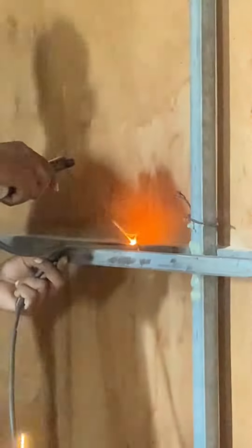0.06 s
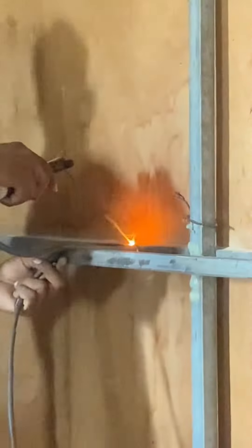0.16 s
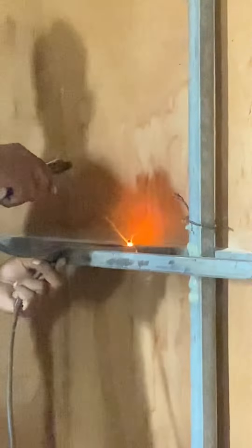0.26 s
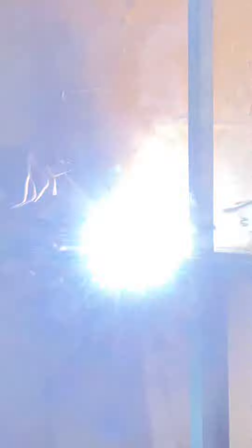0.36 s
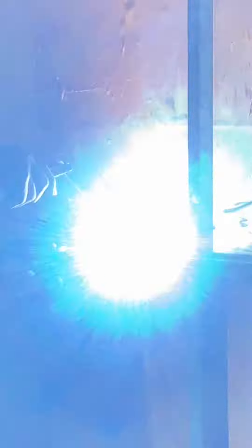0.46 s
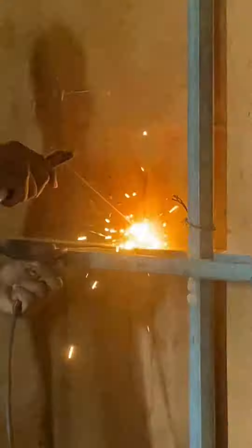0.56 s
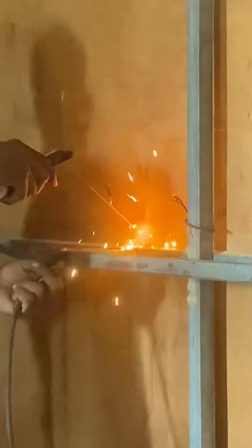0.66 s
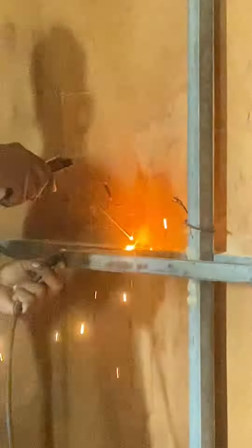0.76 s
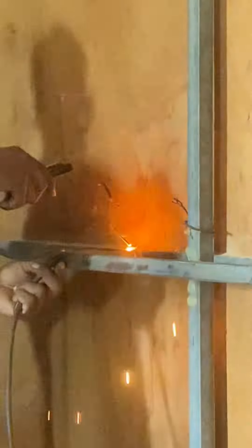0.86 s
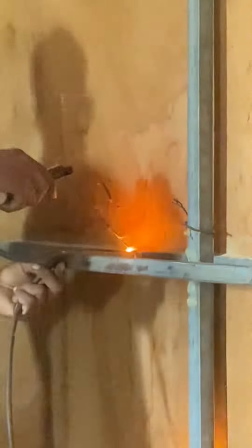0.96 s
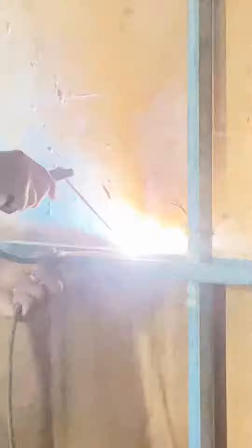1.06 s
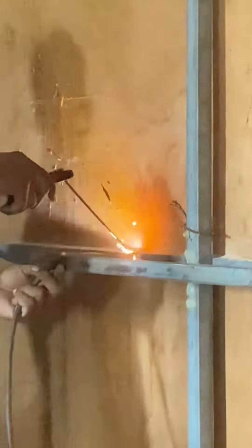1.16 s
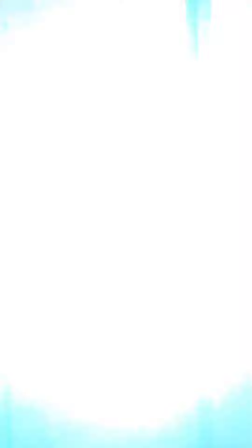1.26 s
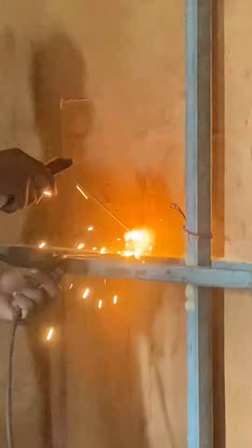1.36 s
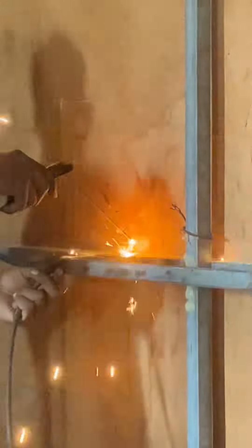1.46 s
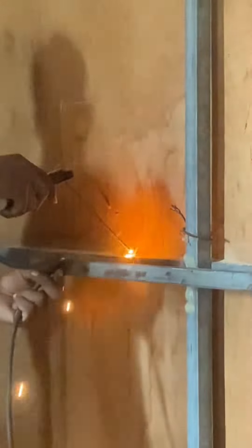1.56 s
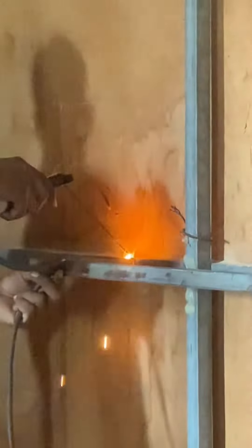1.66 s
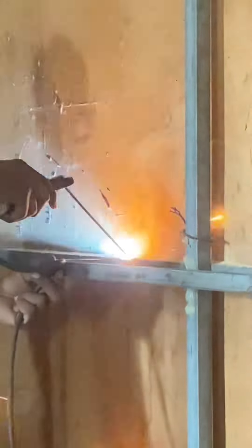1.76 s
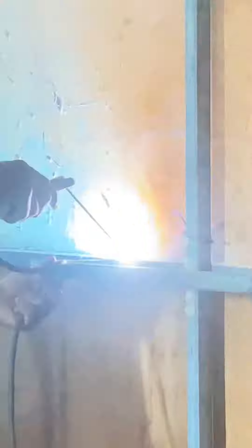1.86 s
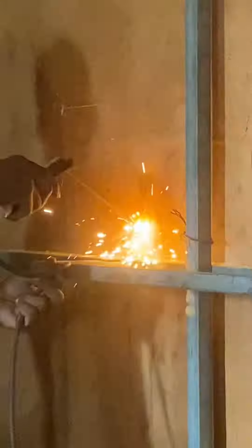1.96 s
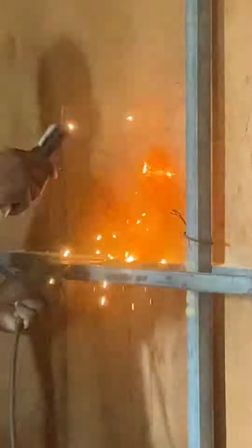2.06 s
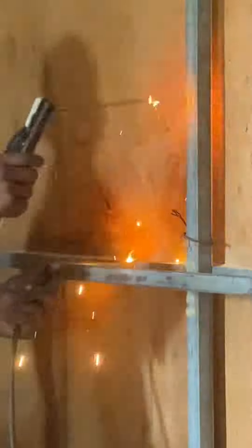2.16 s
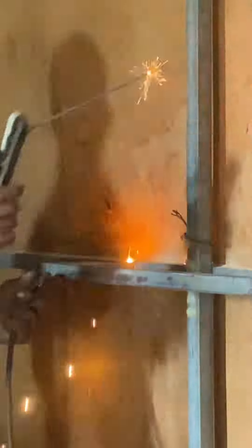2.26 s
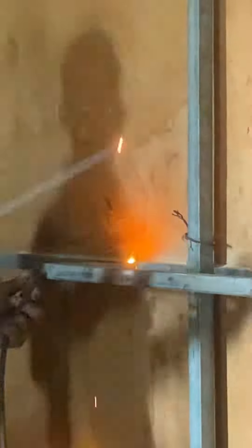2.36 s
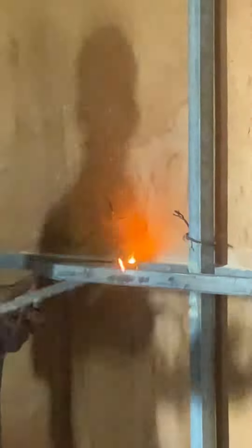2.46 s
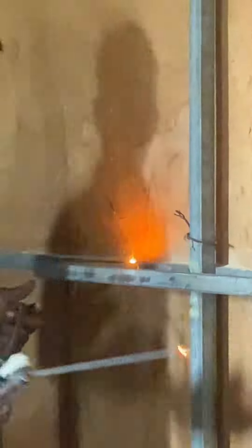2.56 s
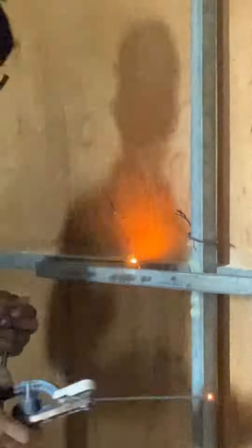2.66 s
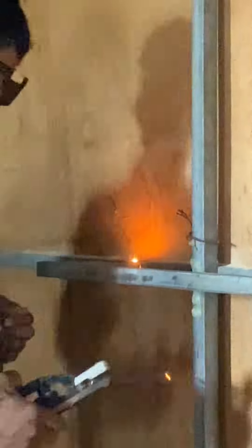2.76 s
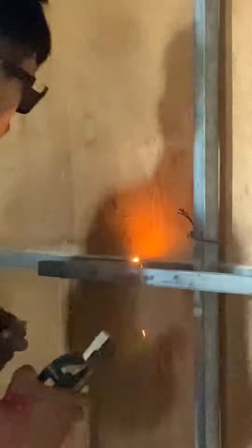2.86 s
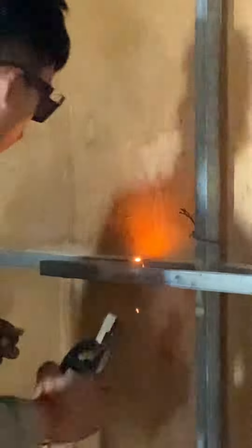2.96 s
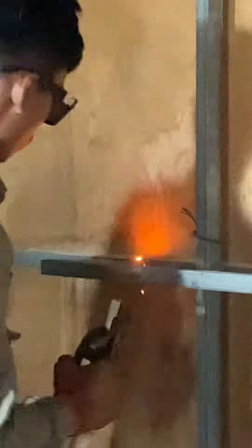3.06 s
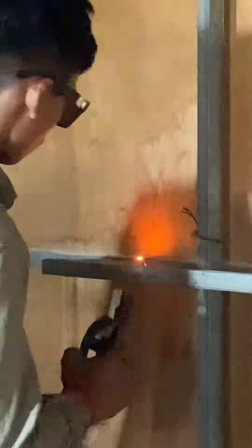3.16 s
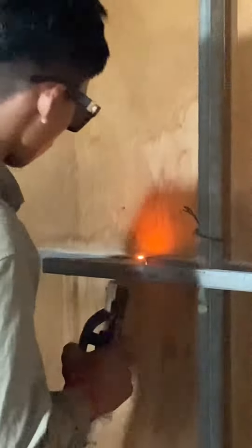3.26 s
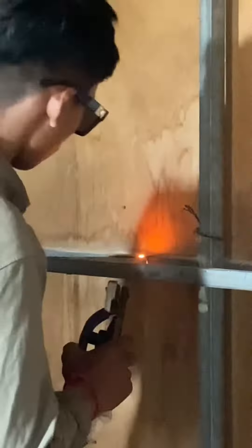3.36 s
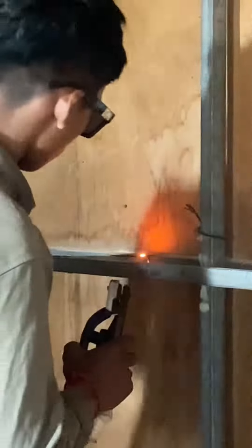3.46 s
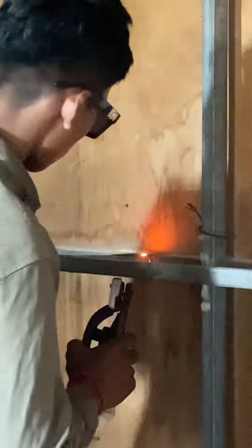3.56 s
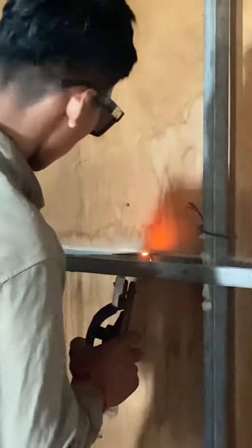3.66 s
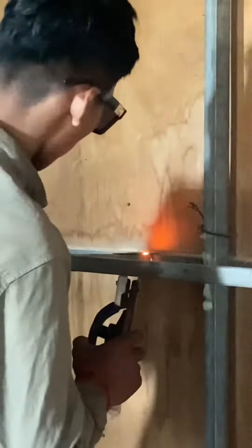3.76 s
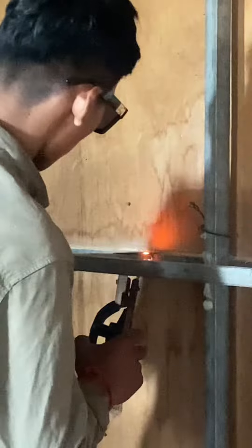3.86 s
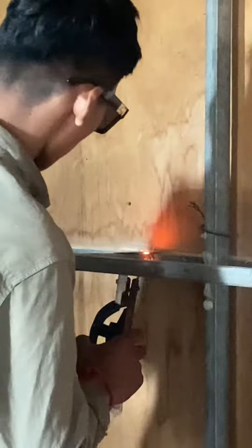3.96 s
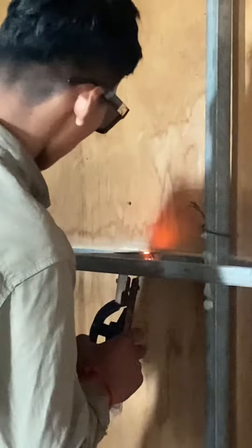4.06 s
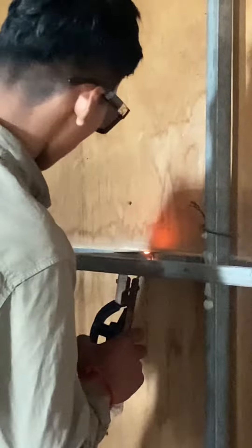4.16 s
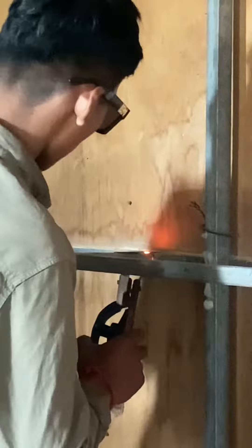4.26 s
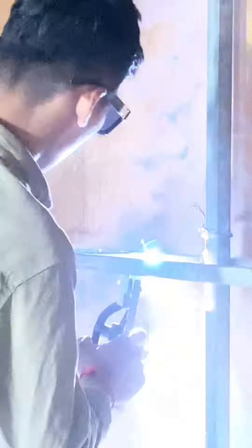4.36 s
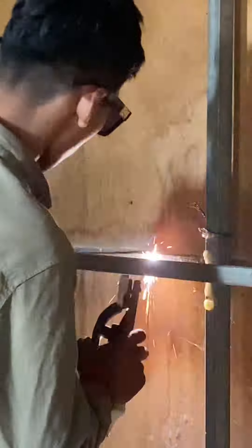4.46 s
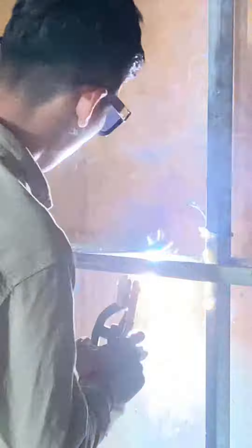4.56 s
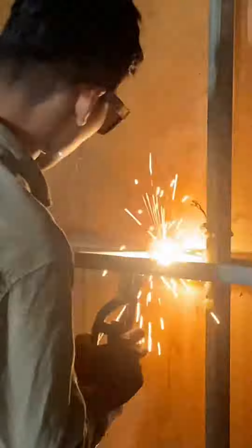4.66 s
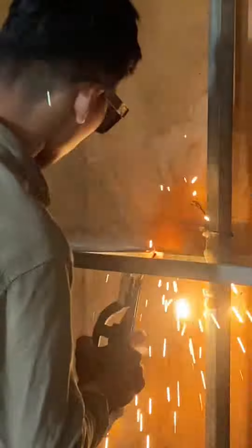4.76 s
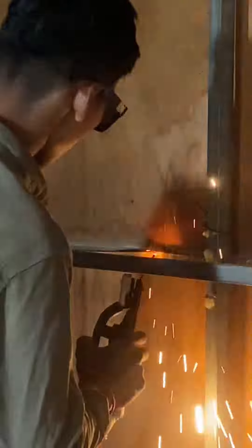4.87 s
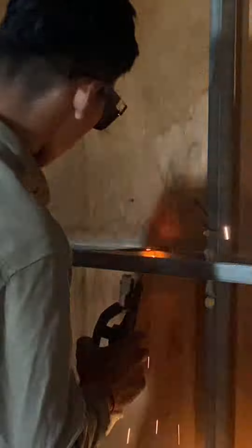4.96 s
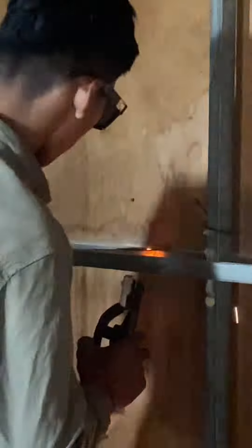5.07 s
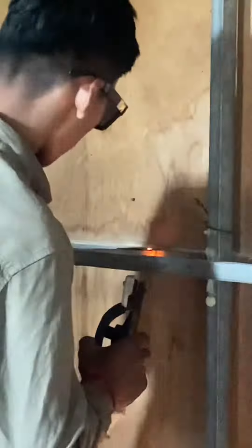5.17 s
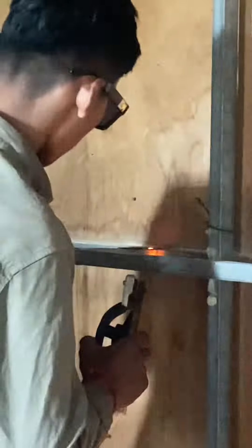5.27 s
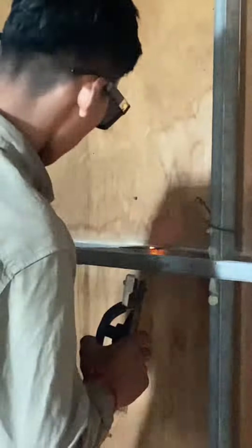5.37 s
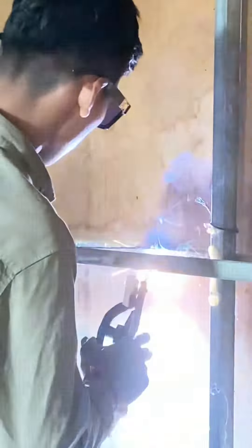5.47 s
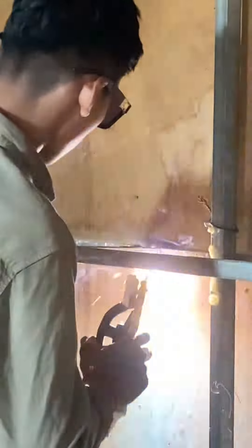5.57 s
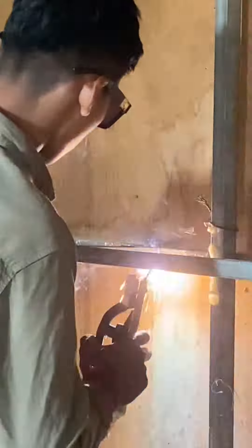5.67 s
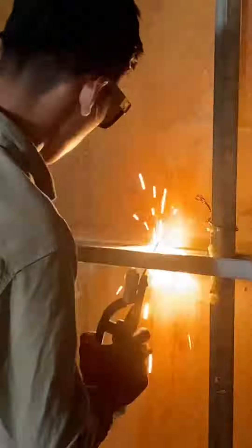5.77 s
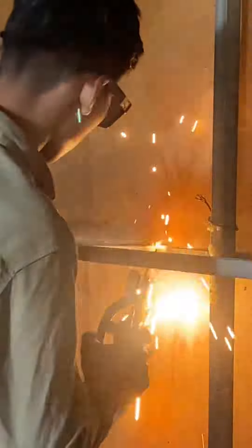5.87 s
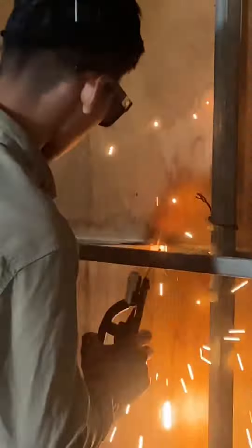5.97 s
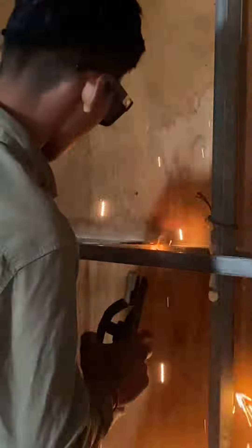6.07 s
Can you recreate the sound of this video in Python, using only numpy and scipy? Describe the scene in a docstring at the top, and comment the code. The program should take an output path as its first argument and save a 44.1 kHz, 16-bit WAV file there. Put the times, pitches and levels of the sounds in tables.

```python
"""Stick welding on a steel tube frame in a big bare-walled hall: six seconds, made from noise, clicks and modes.
First the arc spits close by (clicks on flickering hiss) while far steel bars clatter and ring (struck modes).
Mid-way come dull knocks (bursts of banded noise), a far scrape, wavering squeals (resonant noise) and thuds
(gliding sines); then more knocks, a short bar struck, and the arc's densest spits with the tube ringing under it.
All along run an engine drone and a motor whine (wavering sines) over the wash of the site (coloured noise)."""
import sys
import numpy as np
from scipy import signal
from scipy.fft import rfft, irfft
from scipy.io import wavfile

SR = 44100
rng = np.random.default_rng(int(sys.argv[2]) if len(sys.argv) > 2 else 0)


def persist_wave(psi):
    """Save psi, clipped to +-1, as 16-bit WAV."""
    counts = np.round(np.clip(psi, -1, 1) * 32767).astype(np.int16)
    wavfile.write(sys.argv[1], SR, np.atleast_2d(counts).T)


N = 269892
T = np.arange(N) / SR


def amp(db):
    """dB to gain."""
    return 10 ** (np.asarray(db) / 20)


def rms_one(x):
    """Scale to unit rms."""
    return x / np.sqrt(np.mean(x ** 2) + 1e-20)


def lowpass(x, order, cut_hz):
    """Butterworth treble cut."""
    return signal.lfilter(*signal.butter(order, cut_hz, fs=SR), x)


def highpass(x, cut_hz):
    """Second-order Butterworth bass cut."""
    return signal.sosfilt(signal.butter(2, cut_hz, "high", fs=SR, output="sos"), x)


def bandpass(x, order, low_hz, high_hz):
    """Butterworth band."""
    return signal.sosfilt(signal.butter(order, [low_hz, high_hz], "band", fs=SR, output="sos"), x)


def column(rows, index=1):
    """One column of a time curve, read at every sample."""
    rows = np.array(rows)
    return np.interp(T, rows[:, 0], rows[:, index])


def at_hz(points, hz):
    """A curve over frequency, read on a log-frequency axis."""
    points = np.array(points)
    return np.interp(np.log(hz + 1), np.log(points[:, 0]), points[:, 1])


def coloured(x, spectrum):
    """Give a signal a spectrum; rms 1."""
    hz = np.arange(N // 2 + 1) * SR / N
    return rms_one(irfft(rfft(x) * amp(at_hz(spectrum, hz)), N))


def drift(rate_hz):
    """Slow random wander of rms 1: noise twice through a one-pole low-pass, at a fortieth of the sample rate."""
    r = np.exp(-80 * np.pi * rate_hz / SR)
    noise = rng.standard_normal(N // 40 + 2002)
    slow = signal.lfilter([1], [1, -2 * r, r * r], noise)[2000:]   # without its run-in
    return np.interp(np.arange(N) / 40, np.arange(len(slow)), rms_one(slow))


def ring(x, hz, t60):
    """One mode: a unit click sets a sine of height 1 ringing, down 60 dB after t60 seconds."""
    r = amp(-60 / (t60 * SR))
    w = 2 * np.pi * hz / SR
    return signal.lfilter([0, np.sin(w)], [1, -2 * r * np.cos(w), r * r], x + 1e-18)


def peaks(x, table):
    """Noise twice through each of a few resonances."""
    out = 0
    for hz, width, db in table:
        t60 = 1.4 / width
        out = out + amp(db) * rms_one(ring(ring(x, hz, t60), hz, t60))
    return out


def grains(per_s, spread_db):
    """Random clicks of very uneven size; rms 1."""
    sizes = amp(spread_db * np.minimum(rng.exponential(1, N), 5)) * rng.choice([-1, 1], N)
    return rms_one(sizes * (rng.random(N) < per_s / SR))


def swell(start, rise, hold, db, fade_db_per_s):
    """Rise, hold, then a steady fade in dB."""
    t = T - start
    fade_db = fade_db_per_s * np.maximum(t - rise - hold, 0)
    return np.clip(t / rise, 0, 1) * amp(db - fade_db)


# Flares of the arc, and the bright hiss of the steel crashes at 0.22, 1.15 and 1.47 s. Each row: start in seconds,
# hold in seconds, sizzle level in dB, fade in dB per second.
SIZZLE_SWELLS = [(0.224, .01, -33, 300), (0.26, 0.054, -37, 85), (0.367, 0.005, -35, 400),
                 (0.397, 0.027, -33, 96), (0.929, 0.0037, -54, 395), (1.043, 0.0024, -39.5, 198),
                 (1.118, .03, -40.5, 90), (1.154, 0.018, -34, 145), (1.47, 0.0092, -31, 402),
                 (1.713, 0.077, -36.5, 200), (1.848, 0.028, -33.5, 211), (4.106, 0.0074, -43, 65),
                 (4.31, 0.0038, -19, 296), (4.34, 0.12, -31, 147), (4.441, 0.0085, -32, 102),
                 (4.529, 0.018, -26, 352), (4.957, 0.0045, -52, 90), (5.398, 0.18, -31, 150),
                 (5.634, 0.022, -25.5, 213), (5.667, 0.004, -33, 258), (5.852, 0.027, -46, 194)]
# The loudest spits. Each row: time in seconds, click level in dB before trim and bass cut.
ARC_SPITS = [(0.377, -19), (0.4034, -31), (0.4125, 0), (0.4444, -30), (1.0535, -30), (1.713, -37),
             (1.7393, -29), (1.8794, -17), (3.8397, -19), (4.318, -9), (4.421, -22), (4.436, -20),
             (4.4455, -15), (4.52, -13), (4.554, -8), (5.405, -2), (5.409, -2), (5.498, -4), (5.545, -18),
             (5.5657, -22), (5.628, -6), (5.633, -8), (5.647, -9), (5.663, -14), (5.6802, 5), (5.7, -10),
             (5.706, -13), (5.714, -17)]
# Colour of the sizzle. Each row: frequency in Hz, density in dB per Hz (relative).
SIZZLE_SPECTRUM = [(600, 5), (1500, 6.5), (3000, 3), (5000, 10), (7500, 14), (10500, 1.5), (13000, 10),
                   (15500, -20), (17000, -30)]
SIZZLE_RISE_S = 0.0059
POPS_PER_S, POP_DB, POP_TOP_HZ = 220, -4, 5900   # spatter; level against the sizzle swells
POP_FIZZ_DB = -7   # pops fizz less than spits
SPIT_TRIM_DB, SPIT_LOW_HZ = -4, 1500   # the bass cut serves spits, pops and fizz


def arc():
    """Tiny discharges on flickering hiss (also the crashes' treble), spatter pops, and lone spits that fizz."""
    swells = [swell(start, SIZZLE_RISE_S, *rest) for start, *rest in SIZZLE_SWELLS]
    level = np.sqrt(sum(one ** 2 for one in swells))
    plasma = 0.78 * grains(1700, spread_db=4.0) + 2.2 * rng.standard_normal(N)
    sizzle = level * amp(0.68 * drift(54)) * coloured(plasma, SIZZLE_SPECTRUM)
    pops = lowpass(amp(POP_DB) * level * grains(POPS_PER_S, spread_db=2.0), 2, POP_TOP_HZ)
    spits = np.zeros(N)
    for s, db in ARC_SPITS:
        spits[int(s * SR)] = amp(db + SPIT_TRIM_DB)
    fizz_source = spits + amp(POP_FIZZ_DB) * np.abs(pops)
    fizz_level = signal.lfilter([.4], [1, -np.exp(-1 / (0.001 * SR))], fizz_source)   # dies with a 1 ms constant
    fizz = fizz_level * rng.standard_normal(N)
    return sizzle + highpass(spits + pops + fizz, SPIT_LOW_HZ)


BLOW_SPREAD_DB = 2.5   # how unevenly one fall strikes the modes


def steel(blows, modes, body, crack_db, ring_db):
    """Each fall is a clatter of contacts: a broad crack, and tight mode clusters struck unevenly each time."""
    contacts = grains(3000, spread_db=3.0)
    bursts = []
    for s, db, length, cut_hz in blows:
        part = slice(int(s * SR), int((s + 6 * length) * SR))
        t = T[part] - s
        envelope = np.exp(-t / length) * (1 - np.exp(-t / 0.0029))
        burst = amp(db) * contacts[part] * envelope
        bursts.append((part, lowpass(burst, 2, min(cut_hz, .4 * SR))))

    def clatter(strengths_db):
        """All falls in line, each with its own strength."""
        out = np.zeros(N)
        for (part, burst), db in zip(bursts, strengths_db):
            out[part] += amp(db) * burst
        return out

    even = clatter(np.zeros(len(blows)))
    out = amp(crack_db) * np.std(even) * coloured(even, body)
    split_modes = [(hz * split, db, t60) for hz, db, t60 in modes for split in (.995, 1.0, 1.005)]
    uneven_db = BLOW_SPREAD_DB * rng.standard_normal((len(blows), len(split_modes)))
    heard = slice(bursts[0][0].start, bursts[-1][0].stop + SR)   # ring on for a second after the last fall
    for k, (hz, db, t60) in enumerate(split_modes):
        out[heard] += amp(db + ring_db) * ring(clatter(uneven_db[:, k])[heard], hz, t60)
    return out


# Long bars dropped far off. Each row: start in seconds, relative level in dB, clatter decay constant in seconds,
# contact cut-off in Hz.
BAR_DROPS = [(.227, -21.5, 0.044, 4870), (.275, -24.5, 0.047, 2950), (.33, -34, 0.083, 3940),
             (.4, -29.5, 0.043, 5000), (.48, -28, 0.065, 4400), (.59, -38.5, 0.098, 2900),
             (1.15, -15.5, 0.019, 7500), (1.168, -14.5, 0.011, 4570), (1.2, -17, 0.0094, 3140),
             (1.25, -25.5, 0.041, 4440), (1.33, -32, 0.34, 3540), (1.478, -23.5, 0.052, 6470),
             (1.52, -27, 0.048, 2790)]
# Modes of the long bars. Each row: frequency in Hz, relative level in dB, 60 dB decay in seconds.
LONG_BAR_MODES = [(270, -13, .4), (330, -10, .5), (415, -15, .4), (452, -8, .5), (560, -13, .3),
                  (640, -12, .3), (731, -3, .35), (768, -1, .35), (823, -3, .5), (890, -4, .45),
                  (930, -4, .4), (964, -4, .5), (1008, -3, .55), (1041, 0, .6), (1085, -6, .35),
                  (1130, -7, .4), (1276, -11, .4), (1348, -8, .6), (1416, -9, .4), (1560, -5, .45),
                  (1810, -12, .6), (1940, -12, .4), (2308, -14, .6), (2435, -14, .4), (2713, -13, .5),
                  (2920, -13, .3), (3165, -10, .3), (3270, -11, .3), (3415, -10, .3), (3610, -10, .4),
                  (3890, -14, .3)]
# Crack of a long bar. Each row: frequency in Hz, colouring in dB (relative).
LONG_BAR_CRACK = [(120, -67), (250, -11.5), (500, -1), (750, -11.5), (1100, 2.5), (1500, 4), (2300, -6.5),
                  (3500, -1.5), (4500, -4.5), (9000, -10), (16000, -12)]


def dropped_bars():
    """Long steel bars clatter and ring; a bass cut keeps mainly the sound above 220 Hz."""
    return highpass(steel(BAR_DROPS, LONG_BAR_MODES, LONG_BAR_CRACK, crack_db=14.0, ring_db=-34.0), 220)


# A shorter bar struck. Each row: start in seconds, relative level in dB, clatter decay constant in seconds,
# contact cut-off in Hz.
SHORT_BAR_BLOWS = [(4.587, -16.5, 0.013, 6000), (4.61, -31, 0.058, 5383), (4.68, -53, 0.017, 4000)]
# Modes of the short bar. Each row: frequency in Hz, relative level in dB, 60 dB decay in seconds.
SHORT_BAR_MODES = [(1168, 0, .3), (1491, -8, .25), (1733, -9, .18), (1916, -6, .18), (2213, -9, .2),
                   (2700, -9, .2), (2939, -6, .2), (3241, -9, .2), (3490, -11, .9), (3639, -9, .4),
                   (3876, -7, .22), (4027, -6, .22), (4194, -10, .3), (4457, -8, .35), (4678, -10, .22),
                   (4931, -8, .3), (5437, -10, .3), (5760, -13, .15)]
# Crack of the short bar. Each row: frequency in Hz, colouring in dB (relative).
SHORT_BAR_CRACK = [(300, 7), (900, -18), (1300, 7.5), (2500, -12), (3500, 0), (5500, -2), (7500, -11),
                   (12000, -43)]


def struck_bar():
    """A shorter bar clangs: the same crack and ringing, with higher modes."""
    return steel(SHORT_BAR_BLOWS, SHORT_BAR_MODES, SHORT_BAR_CRACK, crack_db=17.5, ring_db=-30.5)


# Dull knocks and scuffs. Each row: start in seconds, nominal peak in dB, lowest Hz, highest Hz,
# decay constant in seconds, hall send in dB.
KNOCK_BLOWS = [(0.975, -11.5, 138, 637, 0.0028, -11), (2.018, -21.5, 414, 617, 0.12, -3.5),
               (2.072, -18, 375, 750, 0.0098, -3), (2.185, -28.5, 367, 580, 0.0065, 14),
               (2.607, -31.5, 410, 751, 0.022, 17), (2.643, -32, 524, 660, 0.0051, 13.5),
               (3.02, -12, 201, 880, 0.0059, -14), (3.413, -28, 202.3, 600, 0.0054, -20),
               (3.593, -20, 200.2, 600, 0.01, -17), (4.251, -12, 297.6, 2600, 0.0061, -2),
               (4.259, -13, 300, 2786, 0.0096, -28), (4.262, -20.5, 273, 1220, 0.0075, 13.5),
               (4.27, -21, 220, 900, 0.0054, -16), (4.279, -27, 300, 3200, 0.0044, -16),
               (4.322, -14, 278, 2430, 0.0012, 0), (4.351, -14.5, 400, 2780, 0.007, -21),
               (4.364, -18.5, 397, 2430, 0.0043, -19), (4.466, -15.5, 390, 1900, 0.0062, -5),
               (4.559, -21.5, 2670, 3405, 0.0042, 4), (5.638, -26, 1100, 3007, 0.0044, -17),
               (5.703, -15.5, 186, 657, 0.011, -9), (5.824, -54, 253, 685, 0.0082, -18)]
KNOCK_CREST_DB = 11.5   # nominal peak over rms
KNOCK_EDGE = 5.1   # the first contact, against the rough tail


def knocks():
    """Short rough bursts in a band, heaviest at its low end; returns the near sound and the hall send."""
    near, far = np.zeros(N), np.zeros(N)
    rough = rng.standard_normal(N)
    for s, db, low_hz, high_hz, length, hall_db in KNOCK_BLOWS:
        part = slice(int(s * SR), int((s + 7 * length) * SR))
        t = T[part] - T[part][0]
        burst = rough[part] * np.exp(-t / length) * (1 - np.exp(-t / 0.0015))
        burst[0] += KNOCK_EDGE
        heavy = lowpass(burst, 1, 1.2 * low_hz)
        blow = amp(db - KNOCK_CREST_DB) * rms_one(bandpass(heavy, 3, low_hz, high_hz))
        near[part] += blow
        far[part] += blow * amp(hall_db)
    return near, far


# Low thuds. Each row: start in seconds, level in dB, settled pitch in Hz, start pitch over end pitch,
# 60 dB decay in seconds.
THUDS = [(0.431, -11.5, 57, 2.45, 0.12), (2.951, -9, 55.3, 1.7, 0.085), (3.835, -19, 39.76, 0.89, 0.17),
         (4.59, -18.5, 116.3, 1.34, 0.99), (4.597, -24, 173, 1.17, 0.73)]


def thuds():
    """Lone decaying sines with a soft start; the pitch glides, mostly downwards, as the contact lets go."""
    out = np.zeros(N)
    glide_s = .025
    for s, db, hz, start, t60 in THUDS:
        t = np.maximum(T - s, 0)
        cycles = hz * (t + (start - 1) * glide_s * (1 - np.exp(-t / glide_s)))
        envelope = 1000 ** (-t / t60) * (1 - np.exp(-t / .004))
        out += amp(db) * np.sin(2 * np.pi * cycles) * envelope
    return out


# Faint hums, squeals, and from 5.4 s the tube ringing under the arc. Each row: start in seconds, end in seconds,
# relative level in dB, frequency in Hz, width in Hz, hall send in dB.
WAVERING_TONES = [(1.25, 1.7, -42, 152, 9.1, -4), (2.35, 2.63, -39, 135, 8.9, -4),
                  (3.22, 3.75, -41, 126, 9, -4), (2.04, 2.36, -47, 3400, 80, -6),
                  (2.56, 2.8, -44, 2244, 40, -10), (2.62, 2.82, -47, 3530, 160, -8),
                  (2.88, 3.24, -46, 2980, 35, -8), (2.95, 3.1, -49, 2650, 50, -8),
                  (2.92, 3.2, -39, 760, 30, -4), (2.9, 3.18, -54, 4860, 90, -10),
                  (2.93, 3.35, -39, 1110, 70, -6), (5.41, 5.53, -42, 4500, 150, -20),
                  (5.55, 5.62, -44, 3550, 120, -20), (5.59, 5.7, -31, 1500, 300, -20),
                  (5.47, 5.56, -44, 2550, 200, -20), (5.57, 5.67, -39, 2550, 200, -20),
                  (5.62, 5.71, -41, 4720, 130, -20), (5.41, 5.46, -39, 1550, 200, -20)]


def wavering():
    """Narrow resonances fed with noise swell fast, flicker and fade; returns near sound and hall send."""
    near, far = np.zeros(N), np.zeros(N)
    white = rng.standard_normal(N + SR)
    flicker = amp(1.5 * drift(15))
    for start, end, db, hz, width, hall_db in WAVERING_TONES:
        first, last = int(start * SR), min(int(end * SR), N)
        tone = peaks(white[first:last + SR // 4], [(hz, width, db)])[SR // 4:]   # after a quarter second run-in
        envelope = np.abs(np.sin(np.pi * np.linspace(0, 1, last - first) ** 0.6)) ** 0.7
        tone = tone * flicker[first:last] * envelope
        near[first:last] += tone
        far[first:last] += tone * amp(hall_db)
    return near, far


# Far scraping hiss, one row: start in seconds, swell in seconds, hold in seconds, relative level in dB,
# fade in dB per second.
SCRAPE_SWELL = (2, 0.19, 0.17, -45, 85)
# Its resonances. Each row: frequency in Hz, width in Hz, relative level in dB.
SCRAPE_RESONANCES = [(5250, 300, -4), (5200, 1100, -2), (5670, 150, -12), (6100, 900, -6), (7400, 700, -7),
                     (8540, 70, -22), (8800, 500, -14), (10900, 1300, -20)]


def scrape():
    """Noise through high resonances, swelling once and flickering slightly."""
    hiss = peaks(rng.standard_normal(N), SCRAPE_RESONANCES)
    return swell(*SCRAPE_SWELL) * amp(.8 * drift(20)) * hiss


# Engine drone. Each row: time in seconds, pitch in Hz, rms level in dB.
ENGINE_DRONE = [(0, 54.55, -30.5), (1.0, 53.84, -30), (1.09, 55.4, -63), (1.22, 53.5, -30),
                (1.76, 54.3, -23), (1.89, 54.2, -51), (2.11, 54.7, -29.5), (2.95, 54.23, -29.5),
                (3.18, 54.56, -33), (3.42, 53.4, -27), (3.62, 52.8, -28), (3.86, 56.1, -18),
                (4.08, 57.8, -27.5), (4.25, 58.4, -24), (4.53, 58.5, -20), (4.89, 58.84, -21.5),
                (5.02, 57.3, -27.5), (5.27, 55.2, -22.5), (5.62, 55.77, -31.5), (5.75, 56.84, -40),
                (5.9, 59, -22.5), (6.12, 59.7, -33)]
# Engine orders. Each row: multiple of the drone pitch, level in dB before the rev curve.
ENGINE_ORDERS = [(1.5, -37), (2, -40), (2.5, -38), (3, -34)]
# How far the orders stand out. Each row: time in seconds, gain in dB.
ENGINE_REVS = [(0, -9), (3.7, -10.5), (4.7, -2), (6.12, -3)]


def engine():
    """A wavering low sine with a few flickering orders above it."""
    phase = 2 * np.pi * np.cumsum(column(ENGINE_DRONE)) / SR
    tone = amp(column(ENGINE_DRONE, index=2) + 0.64 * drift(4.9)) * np.sin(phase)
    for multiple, db in ENGINE_ORDERS:
        order_level = amp(db + column(ENGINE_REVS) + 2.0 * drift(6.7))
        tone = tone + order_level * np.sin(multiple * phase)
    return np.sqrt(2) * tone


WHINE_HZ, WHINE_DB, WHINE_WAVER_HZ = 1190, -42, 7.0   # pitch, rms level, rms pitch waver


def whine():
    """A thin motor whine: a sine that wavers a little in pitch and level."""
    phase = 2 * np.pi * np.cumsum(WHINE_HZ + WHINE_WAVER_HZ * drift(5.2)) / SR
    return np.sqrt(2) * amp(WHINE_DB + 1.5 * drift(7.0)) * np.sin(phase)


# Wash of the site. Each row: time in seconds, rumble level in dB, hiss level in dB.
WASH_LEVELS = [(0, -28.5, -33), (1.0, -29.5, -33), (2.2, -32, -31), (3.2, -28.5, -33), (4.1, -29, -33.5),
               (5.2, -29.5, -33.5), (6.12, -29, -32)]
# Colour of the rumble. Each row: frequency in Hz, density in dB per Hz (relative).
RUMBLE_SPECTRUM = [(20, -20), (40, 0), (60, 9.5), (90, -1.5), (130, 3), (200, -7.5), (300, -1.5),
                   (420, -0.5), (560, -3), (1000, -22.5), (2000, -66)]
# Colour of the hiss. Each row: frequency in Hz, density in dB per Hz (relative).
HISS_SPECTRUM = [(500, 3.5), (800, 4.5), (1500, 2), (2500, -4), (4000, -8.5), (6000, -15), (7400, -20),
                 (8600, -23), (11000, -28), (13500, -34.5), (16000, -57)]
# Resonances in the wash. Each row: frequency in Hz, width in Hz, level in dB.
WASH_RESONANCES = [(275, 25, -37), (340, 20, -34), (1020, 25, -49), (1120, 30, -47), (1190, 40, -49),
                   (3000, 90, -57)]


def wash():
    """Diffuse stereo rumble and hiss of the site, coloured from noise, with a few resonant tones in it."""
    white = rng.standard_normal((3, 2, N))
    rumble = amp(column(WASH_LEVELS) + 1.0 * drift(4)) * coloured(white[0], RUMBLE_SPECTRUM)
    hiss = amp(column(WASH_LEVELS, index=2) + .8 * drift(5)) * coloured(white[1], HISS_SPECTRUM)
    return rumble + hiss + peaks(white[2], WASH_RESONANCES)


# Decay of the hall. Each row: frequency in Hz, 60 dB decay in seconds.
HALL_DECAY = [(100, 1.4), (500, 1.19), (1000, 1.53), (2000, 1.99), (4000, 0.96), (8000, 0.53),
              (16000, 0.26)]


def hall(x):
    """Two unrelated tails of noise, each octave dying at its own rate, after a very short build-up."""
    t = np.arange(2 * SR) / SR
    tail = 0
    for low_hz in 44 * 2. ** np.arange(9):
        octave = bandpass(rng.standard_normal((2, len(t))), 2, low_hz, min(2 * low_hz, .45 * SR))
        tail = tail + octave * 1000 ** (-t / at_hz(HALL_DECAY, 1.41 * low_hz))
    tail = tail * (1 - np.exp(-t / 0.00029))
    tail = tail / np.sqrt(np.sum(tail ** 2) / 2)
    return signal.fftconvolve(x[None], tail, axes=1)[:, :N]


def scene():
    """Direct sounds sit in the middle; the hall and the wash spread around them."""
    bars, clang, scraping = dropped_bars(), struck_bar(), scrape()
    knock, knock_send = knocks()
    tones, tone_send = wavering()
    weld, thud = arc(), thuds()
    direct = knock + weld + thud + clang + amp(-4.5) * bars + amp(8.0) * scraping
    direct = direct + engine() + whine() + amp(3.0) * tones
    sent = bars + scraping + knock_send + tone_send
    sent = sent + amp(-11.5) * clang + amp(-2.5) * thud + amp(-5.5) * weld
    return direct + wash() + amp(-2.0) * hall(sent)


# Phase between the two microphone ports. Each row: frequency in Hz, left lead in radians.
PORT_LEAD = [(60, 0), (300, -.3), (450, -1.2), (600, -2.8), (1000, -3.1), (1500, -4.4), (1900, -6.28),
             (5300, -6.28), (6100, -4.6), (6900, -3.14), (7900, -3.14), (8700, -1.9), (9900, 0), (11400, 0),
             (12300, 1.8), (13100, 3.14), (14100, 3.14), (14700, 4.8), (15200, 6.28)]
# Stereo width. Each row: frequency in Hz, share of the side signal from 0 to 1.
SIDE_SHARE = [(60, .0002), (250, .01), (450, .05), (700, .45), (1000, .4), (1400, .5), (1750, .2),
              (2100, .012), (2800, .005), (5200, .003), (6000, .06), (7000, .003), (7900, .003), (8800, .1),
              (9800, .002), (11300, .002), (12200, .1), (13300, .003), (14100, .003), (15000, .1)]
# Balance of the ports. Each row: frequency in Hz, left minus right in dB.
LEFT_OVER_RIGHT = [(200, 0), (300, -1), (500, 1.5), (800, -2.5), (1500, -2), (2000, 0)]
CUTOFF_HZ = 16900


def record(dry):
    """A middle and a side signal feed two ports, shifted in phase by band; peaks are clipped, the top is cut."""
    hz = np.arange(N // 2 + 1) * SR / N
    share = np.clip(at_hz(SIDE_SHARE, hz), 0, 1)
    middle = rfft(dry[0]) * np.sqrt(1 - share)
    side = 1j * rfft(dry[1]) * np.sqrt(share)   # a quarter turn apart: neither port is favoured
    half_lead = np.exp(.5j * np.interp(hz, *np.transpose(PORT_LEAD)))
    turn = half_lead * amp(at_hz(LEFT_OVER_RIGHT, hz) / 2)
    pair = irfft([(middle + side) * turn, (middle - side) / turn], N)
    top_cut = signal.cheby2(12, 70, CUTOFF_HZ, fs=SR, output="sos")
    return signal.sosfilt(top_cut, np.clip(pair, -1, 1))


dry = scene()
out = record(dry)
persist_wave(out)
```